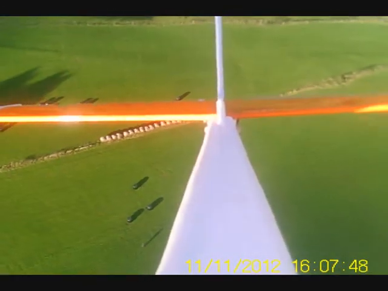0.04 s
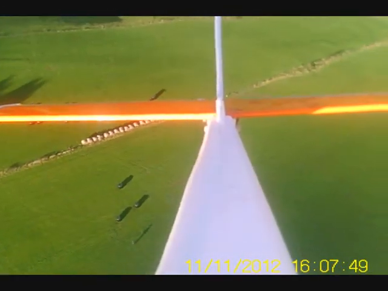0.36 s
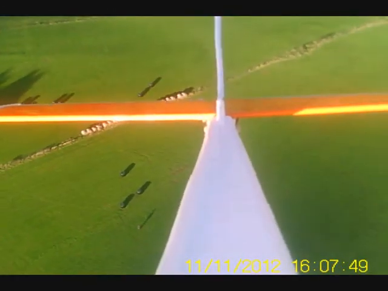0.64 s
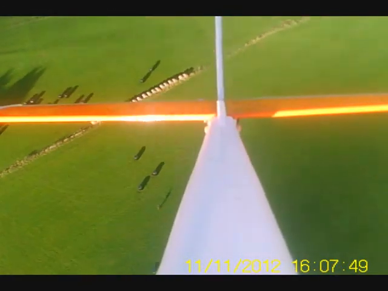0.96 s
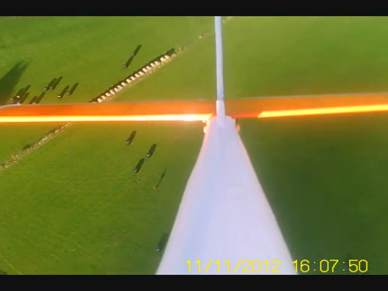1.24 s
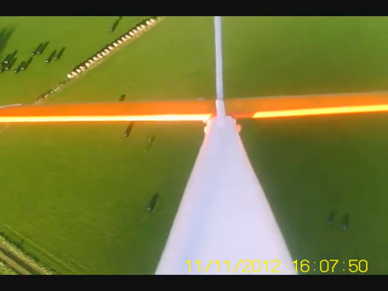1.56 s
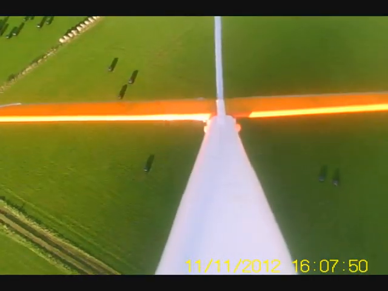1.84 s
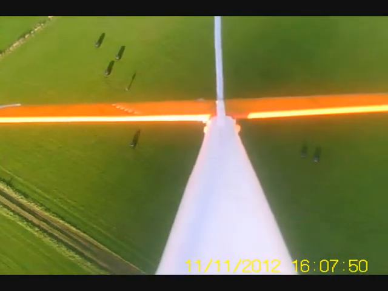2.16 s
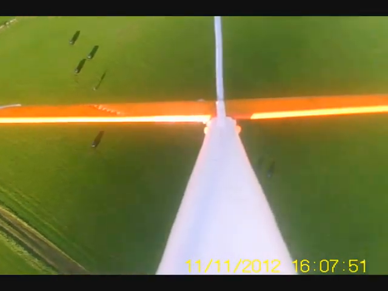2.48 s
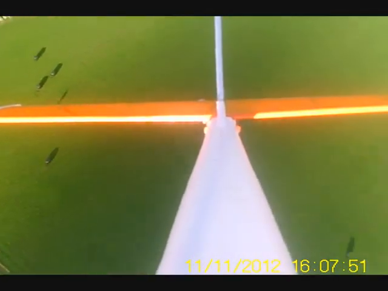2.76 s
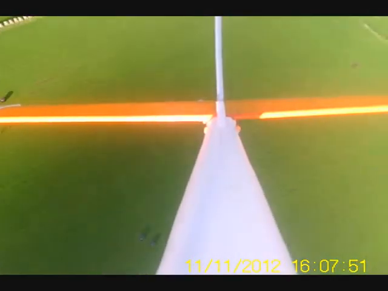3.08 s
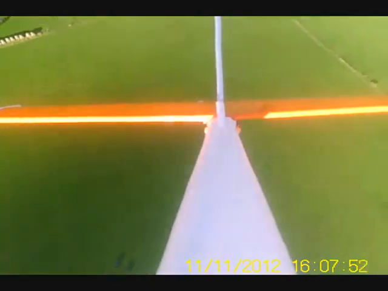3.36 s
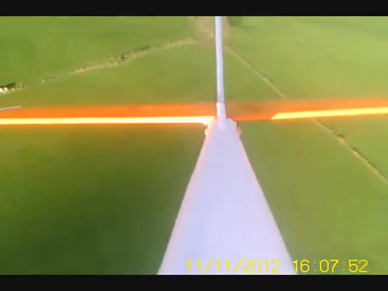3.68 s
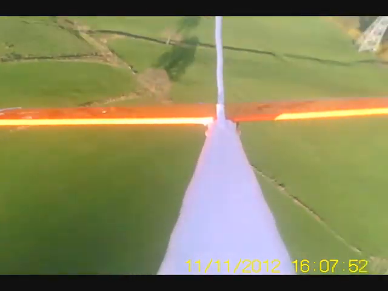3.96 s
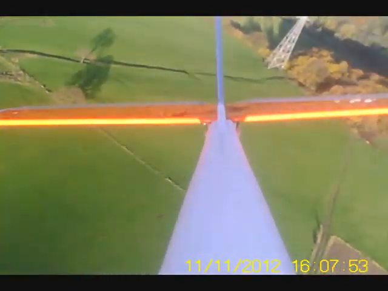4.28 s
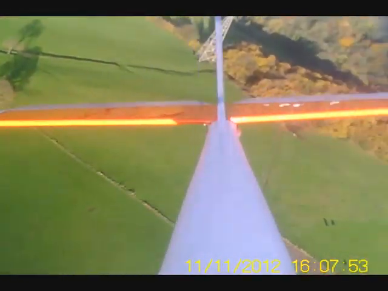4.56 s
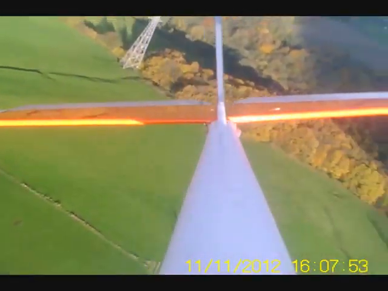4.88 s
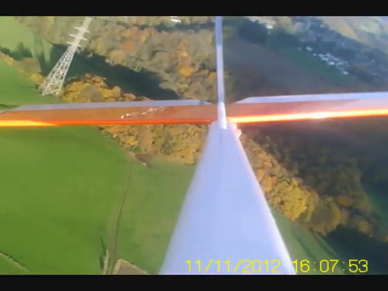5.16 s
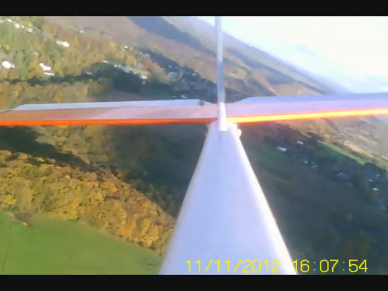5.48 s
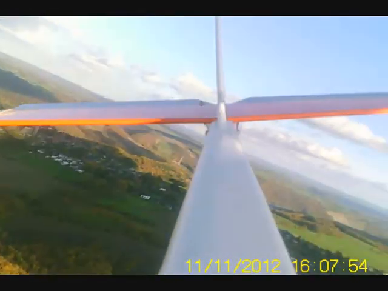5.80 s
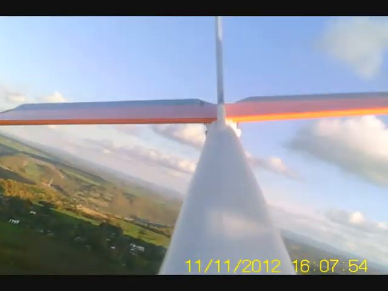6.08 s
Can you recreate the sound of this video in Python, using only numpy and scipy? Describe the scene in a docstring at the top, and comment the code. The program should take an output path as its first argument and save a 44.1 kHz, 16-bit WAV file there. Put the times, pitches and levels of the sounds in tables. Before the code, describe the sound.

From the start, the propeller of an electric model aircraft drones loudly at a steady pitch, with a motor whine above it. It is heard close, from a microphone on the fuselage, where slipstream rushes and wind buffets with low, uneven thuds. Around 1.5 seconds the drone turns smoother and duller, with a couple of gusts just after, then grows buzzy again from 2 seconds. At about 3.2 seconds the throttle closes, and the drone and whine slide down in pitch and fade. A faint, thin, high whistle sounds from roughly 3.3 to 4.7 seconds, and the motor mount buzzes briefly around 4 seconds. The drone is gone by about 4.3 seconds and the motor is still before 5. The aircraft then glides much more quietly, with air hissing over the wings and light wind rumble, swelling a little near 6 seconds.

```python
"""The two-bladed propeller of an electric model aircraft drones at full power, one pressure pulse a blade.
The throttle closes: the drone and the motor tones fall, the mount buzzes, and the speed controller
whistles as it chops the current. The aircraft glides on, with turbulent air hissing over the airframe.
All is heard from a small camera on the fuselage, where the slipstream rushes along the case and
eddies buffet the microphone."""
import sys
import numpy as np
from scipy import signal
from scipy.fft import rfft, irfft, next_fast_len
from scipy.io import wavfile
from scipy.ndimage import uniform_filter1d

SR = 44100
rng = np.random.default_rng(int(sys.argv[2]) if len(sys.argv) > 2 else 0)


def generate_wav(sig):
    """Save sig (samples, or channels by samples) to the path in sys.argv[1] as 16-bit PCM at SR."""
    pcm = np.round(np.clip(np.atleast_2d(sig).T, -1, 1) * 32767).astype(np.int16)
    wavfile.write(sys.argv[1], SR, pcm)


N = 279594

# air over wings and tail, swelling as the aircraft banks: time_s, level_db
AIRFRAME_LEVEL = [(0, -49.5), (3.6, -39), (4.2, -45), (4.85, -41.5), (5.35, -44), (5.85, -38), (6.02, -38),
                  (6.1, -47.5)]
# spectrum of that hiss: frequency_hz, density_db
AIRFRAME_SPECTRUM = [(250, -8), (450, -3.5), (700, 4.5), (950, 0), (1150, 2.5), (1500, -1), (2100, 1.5),
                     (2500, -3), (3000, -11), (3800, -11.5), (4700, -25), (8000, -35)]
# brief dips in the hiss: time_s, depth_db, half_width_s
HISS_DIPS = [(4.3, -4, 0.032), (4.745, -5, 0.058)]
# wind strength at the camera, weakest in the glide: time_s, level_db
WIND_STRENGTH = [(0, -2), (.5, 1), (1.8, 1.5), (2.15, -2.5), (3.1, -1.5), (4.38, -5.5), (4.68, -13.5),
                 (5.6, -15.5), (5.95, -12), (6.25, -7)]
# spectrum of the large eddies: frequency_hz, density_db
LARGE_EDDY_SPECTRUM = [(12, -6.5), (25, 2.5), (45, -5), (75, -5), (130, -12.5), (250, -19.5), (500, -36)]
# spectrum of the small eddies: frequency_hz, density_db
SMALL_EDDY_SPECTRUM = [(70, -14), (140, -3.5), (280, -6), (450, -9.5), (900, -17), (2000, -35)]
# single gusts on the microphone port: time_s, level_db, half_width_s, upper_edge_hz
GUSTS = [(0.642, -20, 0.011, 1300), (.81, -23, 0.02, 60), (1.71, -9, 0.018, 50), (1.822, -12, 0.02, 50),
         (2.597, -13, 0.023, 70), (3.055, -15, 0.02, 375), (4.22, -31, 0.022, 150),
         (4.332, -26.5, 0.013, 786), (4.747, -31, 0.0084, 280), (4.836, -21, .014, 60),
         (5.317, -33, 0.0052, 257), (5.559, -28.5, 0.005, 298), (6.08, -25, 0.024, 200)]
# spectrum of the flow along the case, with its resonances: frequency_hz, density_db
CASE_SPECTRUM = [(110, 1), (190, -2), (280, -0.5), (400, -5.5), (700, -6.5), (1100, -9.5), (2100, -11),
                 (2800, -19), (3800, -19.5), (4900, -27), (6000, -23), (7200, -31.5), (8400, -27.5),
                 (10000, -38.5), (10800, -50)]
# spectrum of the buzzing motor mount: frequency_hz, density_db
MOUNT_SPECTRUM = [(2300, 1.5), (2700, 2.5), (3300, -2.5), (4100, -1.5), (4700, -23.5)]
# spells of part throttle, when the controller chops the current: start_s, end_s, attack_s, level_db
WHISTLE_SPELLS = [(3.33, 4.28, .15, -54.5), (4.385, 4.703, .04, -55.5)]
# motor tones and the resonances they sweep through: shaft_multiple, resonance_hz, bandwidth_hz, peak_db
MOTOR_TONES = [(9.735, 1429, 98, -27.5), (12.03, 860, 230, -45), (41.6, 6490, 300, -53),
               (120, 9200, 1200, -60.5)]
# the shaft runs at full power, then winds down: time_s, speed_hz
SHAFT_SPEED = [(0, 154.8), (1.4, 154.8), (2.2, 153.75), (3.2, 153.7), (3.52, 137.5), (3.7, 123.5),
               (3.9, 112), (4.1, 95.5), (4.46, 70), (4.9, 0)]
# sharpness of the blade pulse, as air meets the propeller more or less askew: time_s, sharpness_db
PULSE_SHARPNESS = [(0, -4), (1, -9.5), (1.5, -19.5), (2, -8), (2.25, -2), (2.65, -0.5), (3.15, 0),
                   (3.55, -4.5), (4.2, -4)]
# even harmonics that form the edge of the pulse: shaft_multiple, relative_db
EDGE_HARMONICS = [(6, 0.5), (8, -4.5), (10, -16)]
# odd harmonics from unequal blades, relative to the edge: shaft_multiple, relative_db
UNBALANCE_HARMONICS = [(3, -10.5), (5, -9.5), (7, -11.5)]


def from_db(db):
    """Amplitude grows tenfold with every 20 decibels."""
    return 10 ** (np.asarray(db) / 20)


def unit_power(x):
    """A signal divided by its RMS value has unit power."""
    return x / np.sqrt(np.mean(x ** 2) + 1e-20)


def curve(rows):
    """Linear interpolation gives a time table a value at every sample."""
    return np.interp(np.arange(N) / SR, *np.transpose(rows))


def drift(rate_hz):
    """Low-pass filtered noise wanders smoothly, with unit spread."""
    pole = np.exp(-80 * np.pi * rate_hz / SR)  # one step every 40 samples
    slow = signal.lfilter([1], [1, -2 * pole, pole * pole], rng.standard_normal(N // 40 + 2002))[2000:]
    return np.interp(np.arange(N) / 40, np.arange(len(slow)), unit_power(slow))


def shaped_noise(spectrum):
    """Spectral shaping colours white noise; it has unit power and falls steeply past the table's ends."""
    size = next_fast_len(N)
    hz = np.maximum(np.fft.rfftfreq(size, 1 / SR), 1)
    points_hz, density_db = np.transpose(spectrum)
    gain = from_db(np.interp(np.log(hz), np.log(points_hz), density_db))
    gain *= np.minimum(hz / points_hz[0], 1) ** 2 * np.minimum(points_hz[-1] / hz, 1) ** 2
    return unit_power(irfft(rfft(rng.standard_normal(size)) * gain, size)[:N])


def evened(x, window_s):
    """Division by the running RMS value holds short-term power near 1."""
    return x / np.sqrt(uniform_filter1d(x ** 2, int(window_s * SR) + 1) + 1e-9)


def electronics(pitch_hz=7400, level_db=-78):
    """A thin tone with wandering phase, masked until the motor is still."""
    return np.sqrt(2) * from_db(level_db) * np.sin(2 * np.pi * pitch_hz * np.arange(N) / SR + .6 * drift(15))


def hiss_dips():
    """A gain envelope with Gaussian notches lowers the hiss briefly."""
    t = np.arange(N) / SR
    return from_db(sum(db * np.exp(-((t - time_s) / width_s) ** 2) for time_s, db, width_s in HISS_DIPS))


def airframe_hiss(flutter_db=1.5):
    """Turbulent flow over wings and tail radiates a fluttering broadband hiss."""
    return from_db(curve(AIRFRAME_LEVEL) + flutter_db * drift(35)) * shaped_noise(AIRFRAME_SPECTRUM)


def wind_buffet(wind_db):
    """Eddies press on the microphone: large ones thud, more fitfully in light wind; small ones are lumpy."""
    swell_db, lump_db = 2.0 - .12 * wind_db, 2.5
    large = evened(shaped_noise(LARGE_EDDY_SPECTRUM), window_s=0.074) * from_db(swell_db * drift(14.3))
    small = evened(shaped_noise(SMALL_EDDY_SPECTRUM) * from_db(lump_db * drift(42)), window_s=0.11)
    return from_db(-19 + 0.86 * wind_db) * large + from_db(-24 + 1.31 * wind_db) * small


def gusts():
    """Each gust is a pressure transient at the port: band-limited noise under a Gaussian envelope."""
    t, out = np.arange(N) / SR, 0
    for time_s, level_db, width_s, upper_hz in GUSTS:
        band = signal.butter(2, [upper_hz / 5, upper_hz], "band", fs=SR, output="sos")
        puff = evened(signal.sosfilt(band, rng.standard_normal(N)), window_s=0.024)
        out = out + from_db(level_db) * np.exp(-.5 * ((t - time_s) / width_s) ** 2) * puff
    return out


def case_wash(angle, speed_hz, sharp_db, wind_db, wake_depth=0.1, flutter_db=0.75):
    """Slipstream and wind add in power along the case; each blade's wake modulates the rush."""
    relative_speed = speed_hz / speed_hz.max()
    slipstream = from_db(-18 + 0.06 * sharp_db) * relative_speed ** 2.8
    flow = np.hypot(slipstream, from_db(-35.5 + wind_db))
    wakes = 1 + wake_depth * relative_speed * np.cos(2 * angle - .4)
    return flow * from_db(flutter_db * drift(40)) * wakes * shaped_noise(CASE_SPECTRUM)


def mount_buzz(angle, speed_hz, level_db=-43, critical_hz=97.0, width_hz=41.0, depth=0.95):
    """Forced vibration: the shaft shakes its mount once a turn, hardest at the critical speed."""
    shake = np.exp(-((speed_hz - critical_hz) / width_hz) ** 2) * (1 + depth * np.cos(angle))
    return from_db(level_db) * shake * shaped_noise(MOUNT_SPECTRUM)


def controller_whistle(angle, switching_hz=7921, sideband_db=-14, release_s=0.027):
    """Commutation, twelve times a turn, modulates the switching tone; sidebands close in as it slows."""
    t = np.arange(N) / SR
    envelope = sum(from_db(db) * np.clip(np.minimum((t - start_s) / attack_s, (end_s - t) / release_s), 0, 1)
                   for start_s, end_s, attack_s, db in WHISTLE_SPELLS)
    commutation = 1 + 2 * from_db(sideband_db) * np.cos(12 * angle + .15 * drift(30))
    return np.sqrt(2) * envelope * commutation * np.sin(2 * np.pi * switching_hz * t)


def motor_whine(angle, speed_hz, jitter_rad=0.043):
    """Bearing and magnet tones fall with the shaft and swell by resonance in the mount."""
    angle, out = angle + jitter_rad * drift(40), 0
    for multiple, resonance_hz, bandwidth_hz, peak_db in MOTOR_TONES:
        response = 1 / (1 + (2 * (multiple * speed_hz - resonance_hz) / bandwidth_hz) ** 2)
        out = out + from_db(peak_db) * np.sqrt(2) * response * np.sin(multiple * angle)
    return out


def thrust_share(speed_hz, idle_hz=86.4):
    """Thrust grows with the square of shaft speed and vanishes where the blades idle."""
    return np.maximum(speed_hz ** 2 - idle_hz ** 2, 0) / (speed_hz.max() ** 2 - idle_hz ** 2)


def propeller(angle, speed_hz, sharp_db, sway_rad=0.019):
    """Periodic pressure dips from the blades form a harmonic series; sharp ones have strong overtones."""
    angle = angle + sway_rad * drift(26)  # gusts bend the timing
    waver_db = 1.8 - 0.17 * sharp_db  # overtones are steadier in a sharp pulse
    tone_db, edge_db = -15 + 0.11 * sharp_db, -25.5 + sharp_db
    octave_gain = np.hypot(from_db(-34), from_db(-19 + 2.85 * sharp_db))  # a blunt pulse keeps some
    blade_tone = from_db(tone_db + 0.5 * drift(6.3)) * np.cos(2 * angle)
    octave = octave_gain * from_db(waver_db * drift(5.7)) * np.cos(4 * angle)
    edge = sum(from_db(edge_db + db + waver_db * drift(8.9)) * np.cos(multiple * angle)
               for multiple, db in EDGE_HARMONICS)
    shaft_hum = from_db(tone_db - 14 + 2.6 * drift(5.2)) * np.cos(angle)  # unbalance, once a turn
    wobble = sum(from_db(edge_db + db + 1.8 * drift(4.6)) * np.cos(multiple * angle)
                 for multiple, db in UNBALANCE_HARMONICS)
    pulses = -np.sqrt(2) * (blade_tone + octave + edge + shaft_hum + wobble)
    return thrust_share(speed_hz) ** .65 * pulses


def scene():
    """The sources superpose: one shaft drives propeller, motor and slipstream, and the wind outlasts it."""
    speed_hz, sharp_db, wind_db = curve(SHAFT_SPEED), curve(PULSE_SHARPNESS), curve(WIND_STRENGTH)
    angle = 2 * np.pi * np.cumsum(speed_hz) / SR
    drone = propeller(angle, speed_hz, sharp_db)
    tones = motor_whine(angle, speed_hz) + controller_whistle(angle) + electronics()
    hiss = case_wash(angle, speed_hz, sharp_db, wind_db) + mount_buzz(angle, speed_hz) + airframe_hiss()
    return (drone + tones + hiss_dips() * hiss + wind_buffet(wind_db) + gusts())[None]


def record(dry):
    """Soft saturation in the camera rounds the highest peaks; a steep low-pass filter limits the band."""
    cutoff_hz = 10790
    rounded = dry / (1 + dry ** 6) ** (1 / 6)
    return signal.sosfilt(signal.ellip(14, .1, 90, cutoff_hz, fs=SR, output="sos"), rounded)


dry = scene()
out = record(dry)
generate_wav(out)
```